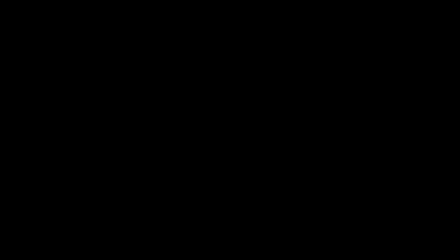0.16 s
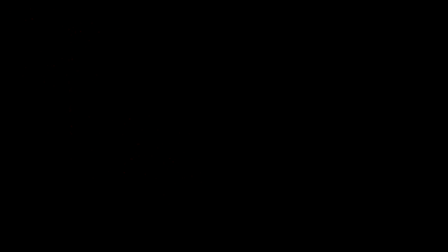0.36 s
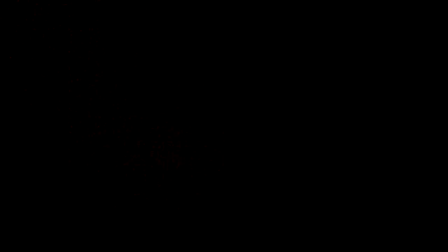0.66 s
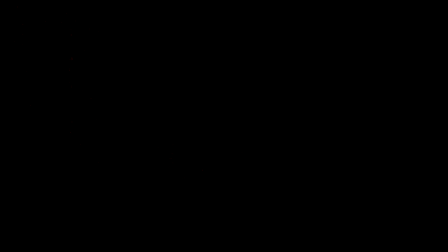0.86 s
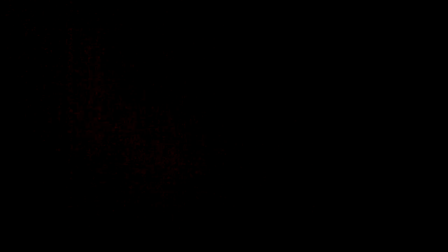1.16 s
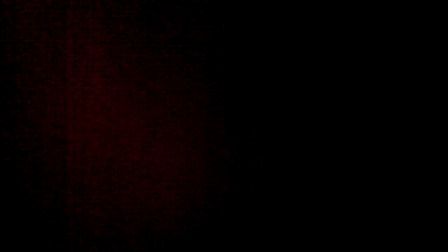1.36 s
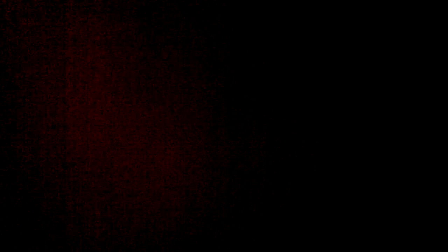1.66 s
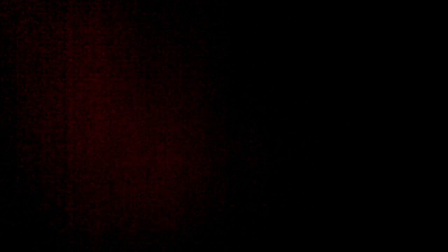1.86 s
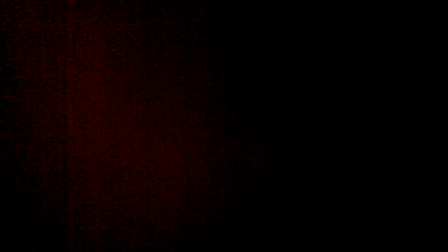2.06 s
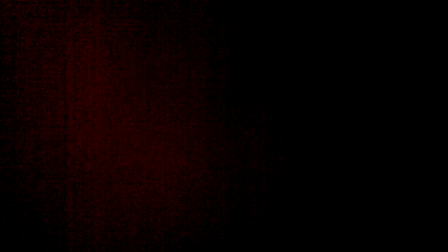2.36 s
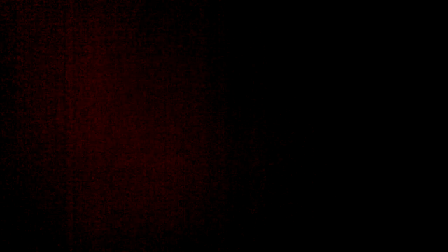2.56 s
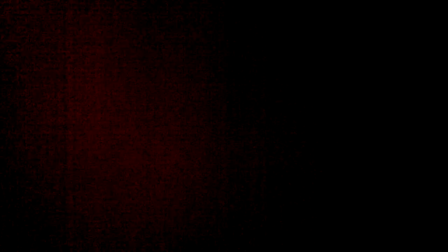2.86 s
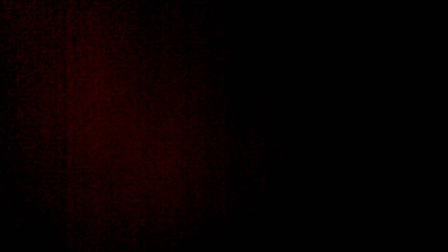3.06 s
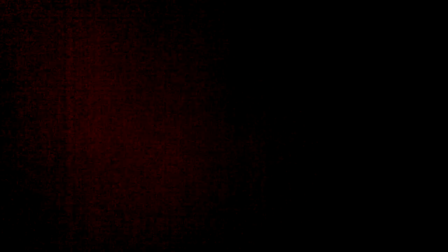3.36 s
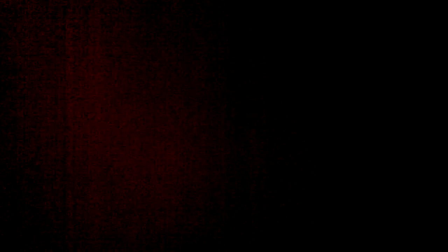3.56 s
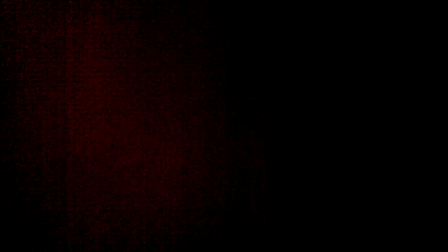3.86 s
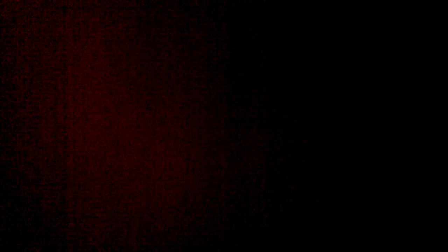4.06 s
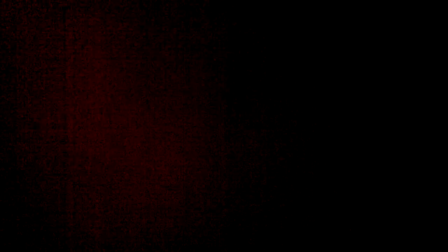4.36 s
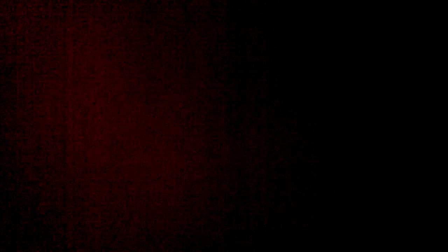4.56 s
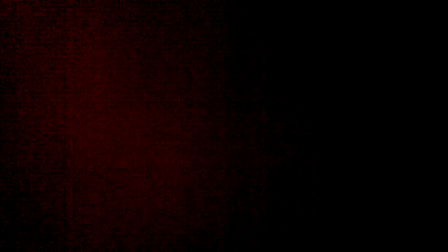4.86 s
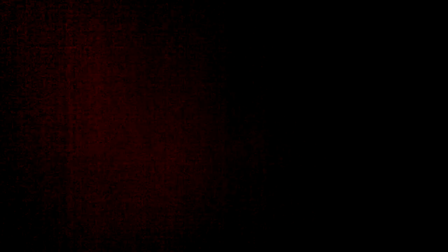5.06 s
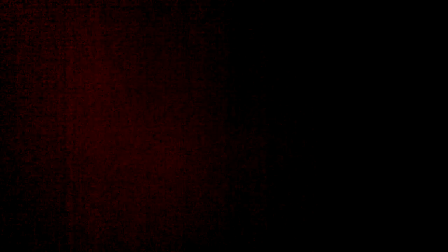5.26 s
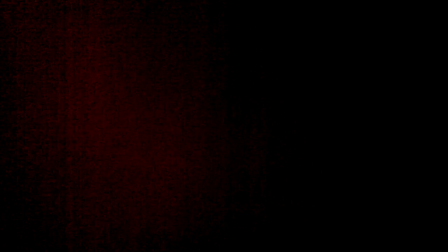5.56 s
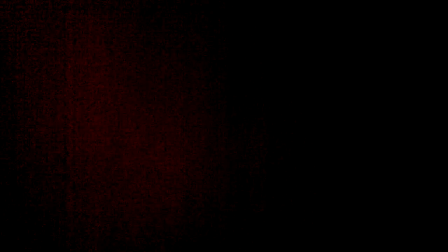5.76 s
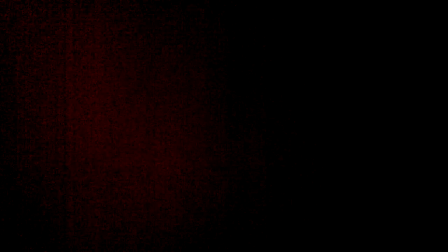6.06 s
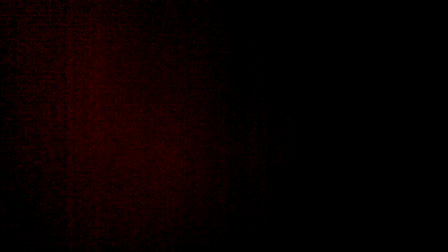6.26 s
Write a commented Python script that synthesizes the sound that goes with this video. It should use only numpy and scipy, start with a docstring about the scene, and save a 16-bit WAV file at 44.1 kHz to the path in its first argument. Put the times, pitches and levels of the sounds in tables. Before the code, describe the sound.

A close, dry perspective on a failed laptop hard drive in a quiet room with soft air noise, a low hum and a very thin high whine. At 0.11 s a hand hits the case with a hard double clack, with a grainy scuff fading until 0.24 s. A faint bump follows at 0.25, a duller double thud at 0.61, then weaker bumps at 0.74, 0.87 and 0.90 and small edge snaps until 1.02. At 1.04 the latch gives a tiny high tick; a faint stuttering motor rasp runs from 1.12 and quickens into a very short, loud metallic knock at 1.32, with a lighter knock back at 1.73. The cycle repeats: tick 2.47, scrape 2.50, knock 2.67, return 3.08; then tick 3.82, scrape 3.87, knock 4.03, return 4.44. A last tick at 5.18 and scrape until 5.37 bring no knock. Barely audible stray ticks dot the quiet to the end.

```python
"""In a quiet room, close up: a failed laptop hard drive. A hand bumps and scuffs its case at first.
Then the drive tries over and over: a latch tick, a short scrape of motor steps that mostly quicken,
a hard knock of the head arm on its stop and a lighter knock back, over a low hum and a thin whine.
Knocks and bumps are dying sines with short noise bursts; the rub is a dense stream of tiny slips.
The motor is pulsed, narrow-band noise with a ringing hub; air and hiss are coloured noise."""
import sys
import numpy as np
from scipy import signal
from scipy.fft import rfft, irfft
from scipy.io import wavfile

SR = 44100
rng = np.random.default_rng(int(sys.argv[2]) if len(sys.argv) > 2 else 0)


def bounce(signal):
    """Save signal as a 16-bit WAV file at the path given by the first command-line argument."""
    frames = np.transpose(np.atleast_2d(signal))
    limited = np.clip(frames, -1, 1)
    pcm = np.round(limited * 32767).astype(np.int16)
    wavfile.write(sys.argv[1], SR, pcm)


N = 283122
TIME = np.arange(N) / SR
RING = TIME[:SR // 6]  # the time axis of one blow

# In the tables, t60/s is the time a ring takes to fade by 60 dB.
# what the arm and its stop ring with: f/Hz, level/dB, t60/s
ARM_MODES = [(1083, -39, 0.046), (1302, -42.5, 0.078), (1500, -55, 0.062), (2011, -29, 0.054),
             (2430, -38.5, 0.023), (3285, -14.5, 0.006), (3720, -27, 0.033), (4030, 3.6, 0.0073),
             (4110, 5.5, 0.0037), (4900, -12.5, 0.011), (5244, -12.5, 0.0089), (5990, -6.5, 0.0025),
             (6490, -22, 0.017), (7020, -13, 0.0046), (7580, -25.5, 0.014), (8080, -30, 0.019),
             (9340, -21, 0.0031), (11600, -28, 0.0076)]
# colour of the noise at the instant of contact: f/Hz, level per Hz/dB
CRACK_COLOUR = [(470, -55), (800, -47), (1180, -2.5), (3210, -32), (4060, 3), (4600, -10), (5340, -21.5),
                (10300, -42), (11700, -31), (12900, -42), (15500, -43)]
# what the latch rings with: f/Hz, level/dB, t60/s
LATCH_MODES = [(8180, 2.5, 0.0093), (8380, -8.5, 0.0047)]
# the head arm touches the latch before each try: t/s
LATCH_TIMES = [1.0440, 2.4734, 3.8227, 5.1829]
# how every latch touch sounds: level/dB, brightness/(dB per octave), latch ring/dB
LATCH_TOUCH = (-38.7, 9, -40.5)
# the head arm is thrown against its stop: t/s
THROW_TIMES = [1.3245, 2.6736, 4.0339]
# a hard knock, a faint touch and a knock back:
# t after the throw/s, level/dB, brightness/(dB per octave), latch ring/dB
THROW_KNOCKS = [(0, -15, 1, -49), (.1365, -44, 1, -50), (.4099, -27, -1.2, -37.5)]

# the motor tries to turn: start t/s, end t/s, sizzle level/dB, jolt level/dB, current build-up/s
MOTOR_TRIES = [(1.117, 1.145, -56, -54.5, .005), (1.147, 1.323, -52, -56, .08),
               (2.502, 2.675, -54.5, -55, .005), (3.871, 4.035, -54, -54.5, .005),
               (5.2235, 5.372, -54.5, -54.5, .005)]
# noise bands of the motor windings: f/Hz, width/Hz, level/dB
WINDING_BANDS = [(5500, 4000, 1), (8120, 300, 1), (9200, 600, -5), (10820, 500, 3), (11900, 1600, -8),
                 (14200, 700, 0), (15600, 700, 0)]
# what the motor hub rings with: f/Hz, level/dB, t60/s
HUB_MODES = [(1052, -4, 0.028), (1130, -2.5, 0.032), (1440, -1.5, 0.0086), (1880, -2, 0.014),
             (2330, -0.5, .01), (2900, -5, .005), (4250, -0.5, 0.0043)]
START_STEPS_PER_S, START_S = 100, .042  # each try begins with slow, even steps
RUN_STEPS_PER_S, SPEEDUP_PER_S2 = 120, 640  # then the rate jumps and climbs steadily

# faint stray ticks: t/s, level/dB, f/Hz
STRAY_TICKS = [(.4265, -54, 7800), (.8073, -52.5, 7340), (.8155, -55, 7400), (.988, -52, 7800),
               (1.095, -55, 7800), (3.0142, -53, 8200), (3.4601, -57, 6600), (4.8022, -56, 8700)]
# a faint tick that keeps time: first t/s, period/s, level/dB, f/Hz
PACED_TICK = (3.649, .6423, -56, 8050)

# bumps on the case: t/s, thud level/dB, hardness f/Hz
CASE_BUMPS = [(.1076, -17.7, 2600), (.1121, -22.5, 2300), (.251, -41, 1500), (.6146, -22, 860),
              (.6177, -20.3, 1710), (.7387, -27, 1190), (.8708, -36, 1160), (.9003, -41, 2000)]
# after a full blow the case bounces twice: t after the blow/s, level/dB, share of the hardness
CASE_BOUNCES = [(.0104, -7, .59), (.0218, -16.6, .95)]
FULL_BLOW_DB = -19
BOUNCE_SOONER, BOUNCE_WEAKER = .29, .75  # a lighter blow bounces sooner and less: powers of its strength
# what the case rings with: f/Hz, level/dB, t60/s
CASE_MODES = [(231, -4.5, 0.0077), (285, -14, 0.028), (371.5, -15.5, 0.042), (438, -4, 0.013),
              (571, -17, 0.07), (676, -9, 0.02), (859, -11, 0.035), (995, -7.5, 0.029), (1220, 1, 0.014),
              (1403, -7, 0.04), (1574, -22, 0.06), (1600, 5, 0.0047), (1820, 5, 0.0068), (2113, -5, 0.022),
              (2267, -9, 0.019), (2930, -7, 0.0081), (3430, -12, 0.018), (3700, -9, 0.018)]
# the first, hardest blow also rings the hollow of the case: f/Hz, level/dB, t60/s
HOLLOW_MODES = [(384.5, -40.5, .17), (415, -22, 0.034)]
# sharp snaps of the case's edges: t/s, level before the treble cut/dB, top f/Hz
EDGE_SNAPS = [(.1076, -17, 6000), (.1072, -19, 15000), (.1125, -21.5, 6000), (.1822, -34, 9000),
              (.188, -37, 9000), (.6147, -37.5, 9000), (.6177, -32.5, 7000), (.9003, -39.5, 8000),
              (.9157, -31, 10900), (1.019, -39, 7000), (1.0244, -39.5, 20200)]
# colour of the snap noise: f/Hz, level per Hz/dB
SNAP_COLOUR = [(880, -3), (1500, -8.5), (5040, -7.5), (7470, -1), (9010, 3), (12400, -10.5), (15800, -9)]

# strokes of the hand over the case: start t/s, length/s, level/dB, swell/(dB per s)
HAND_RUBS = [(.108, .134, -38.5, -44), (.25, .11, -63, -75), (.418, .11, -65, -25), (.775, .125, -71, 40),
             (.945, .13, -61, -50)]
# colour of the rubbing noise: f/Hz, level per Hz/dB
RUB_COLOUR = [(150, -43), (250, -21), (297, -13), (372, -4), (427, -6.5), (795, -21), (1310, -0.5),
              (1990, -9.5), (2660, -17), (3110, -8.5), (5500, -15.5), (6310, -7.5), (7130, -8), (8620, -1),
              (15500, -37.5)]
RUB_ATTACK_S, RUB_RELEASE_DB_PER_S = .008, 1100

# colour of the room air and hiss: f/Hz, level per Hz/dB
AIR_COLOUR = [(20, -12.5), (50, -6.5), (110, -5), (150, 0), (190, -4), (300, -4), (800, -6.5),
              (2000, -13.5), (6000, -17.5), (7400, -15), (8100, -12), (10000, -18.5), (15500, -17)]
AIR_DB = -62.5
# steady hum and whine: f/Hz, width/Hz, level/dB, waver (0 to 1)
HUM_LINES = [(90, 5, -73.5, 0.25), (222, 15.6, -76, 0.96), (7984, 2.5, -75, 0.3)]
# the level dips briefly: from t/s, to t/s
DROPOUT = (0.0917, .1055)
TOP_HZ = 15850  # the treble ends here


def amp(db):
    """Turns decibels into a gain."""
    return 10 ** (np.asarray(db) / 20)


def evened(x):
    """Scales a sound to an rms (average strength) of 1."""
    return x / np.sqrt(np.mean(x ** 2) + 1e-20)


def add(mix, s, sound):
    """Mixes a sound in at time s."""
    part = mix[max(round(s * SR), 0):][:len(sound)]
    part += sound[:len(part)]


def coloured(x, points):
    """Shapes the spectrum of x by a line drawn through (Hz, dB) points, at rms 1."""
    hz, db = np.transpose(points)
    f = np.fft.rfftfreq(len(x), 1 / SR)
    gain = amp(np.interp(np.log(f + 1), np.log(hz + 1), db))
    return evened(irfft(rfft(x) * gain, len(x)))


def band(hz, width_hz, size):
    """Noise gathered around one resonance, at rms 1."""
    f = np.fft.rfftfreq(size, 1 / SR)
    noise = rfft(rng.standard_normal(size))
    return evened(irfft(noise / (1 + ((f - hz) / width_hz) ** 2), size))


def fade(t60):
    """An exponential decay by 60 dB in t60 seconds."""
    return np.exp(-np.log(1000) * RING / t60)


def ring(modes, weight_db=lambda hz: 0):
    """Dying sines of a struck body; weight_db says how strongly the blow reaches each."""
    out = np.zeros(len(RING))
    for k, (hz, db, t60) in enumerate(modes):
        # neighbouring modes swing against each other, so the sound takes a moment to build
        sign = (-1) ** k
        out += sign * amp(db + weight_db(hz)) * fade(t60) * np.sin(2 * np.pi * hz * RING)
    return out


def burst(peak_s):
    """An envelope that rises to 1 at peak_s and dies away."""
    return RING / peak_s * np.exp(1 - RING / peak_s)


def knocks():
    """Lists every contact of the arm: t/s, level/dB, brightness/(dB per octave), latch ring/dB."""
    rows = [(s, *LATCH_TOUCH) for s in LATCH_TIMES]
    for s in THROW_TIMES:
        rows += [(s + delay, *knock) for delay, *knock in THROW_KNOCKS]
    return rows


def head_arm(contact_s=.0001, crack_db=-23, crack_s=0.00086, pivot_hz=4100,
             shiver_db=-39.5, shiver_width_hz=900, shiver_t60=0.1):
    """Each contact makes the metal ring and crack, loose parts shiver after it, and the latch rings."""
    out = np.zeros(N)
    press = 1 - np.exp(-RING / contact_s)  # the force sets in over the contact time
    for s, db, tilt_db, latch_db in knocks():
        # brightness tilts the ring around the pivot
        metal = press * ring(ARM_MODES, lambda hz: tilt_db * np.log2(hz / pivot_hz))
        crack = coloured(rng.standard_normal(len(RING)), CRACK_COLOUR) * burst(crack_s)
        shiver = band(pivot_hz, shiver_width_hz, len(RING)) * fade(shiver_t60)
        knock = metal + amp(crack_db) * crack + amp(shiver_db) * shiver
        add(out, s, amp(db) * knock + amp(latch_db) * ring(LATCH_MODES))
    return out


def step_rate(age):
    """Motor steps a second at this age of a try."""
    running = RUN_STEPS_PER_S + SPEEDUP_PER_S2 * (age - START_S)
    return np.where(age < START_S, START_STEPS_PER_S, running)


def motor(between=0.37, sizzle_s=0.0042, lag_s=.0004, off_beat_db=5.0, uneven_db=2.0,
          rattle=0.52, rattle_s=0.0013, weak_db=-8):
    """Each step of current makes the windings sizzle; every second step jolts and rattles the hub."""
    current, jolts = np.zeros(N), np.zeros(N)
    pulse = np.sin(np.pi * np.minimum(RING / sizzle_s, 1)) ** 2
    for start, end, sizzle_db, jolt_db, build_s in MOTOR_TRIES:
        age = np.arange(0, end - start, 1 / SR)
        step_count = np.cumsum(step_rate(age)) / SR
        # a step falls wherever the count passes a whole number
        steps = age[np.diff(np.floor(step_count), prepend=-1) > 0]
        flow = np.full(len(age), between)  # the current that flows between pulses
        for k, s in enumerate(steps):
            step_db = uneven_db * rng.standard_normal() + off_beat_db * (k % 2 - 0.5)
            add(flow, s + lag_s, amp(step_db) * (1 - between) * pulse)
            if k % 2 == 0:
                chatter = burst(rattle_s) * rng.standard_normal(len(RING))
                click = np.sqrt(max(1 - rattle ** 2, 0)) * (RING == 0)
                kick = click + rattle * chatter / np.linalg.norm(chatter)
                add(jolts, start + s, amp(jolt_db) * kick)
        build_db = weak_db * np.maximum(1 - age / build_s, 0)
        add(current, start, flow * amp(sizzle_db + build_db))
    sizzle = evened(sum(amp(db) * band(hz, width, N) for hz, width, db in WINDING_BANDS))
    return current * sizzle + signal.fftconvolve(jolts, ring(HUB_MODES))[:N]


def ticks(width_hz=550, peak_s=0.00085):
    """Short fizzy ticks, each in one narrow band: some stray, some at a steady pace."""
    out = np.zeros(N)
    shape = burst(peak_s)
    first, period, paced_db, paced_hz = PACED_TICK
    paced = [(s, paced_db, paced_hz) for s in np.arange(first, N / SR, period)]
    for s, db, hz in STRAY_TICKS + paced:
        fizz = shape * band(hz, width_hz, len(RING))
        # every tick gets the energy of its envelope
        add(out, s, amp(db) * fizz * np.linalg.norm(shape) / np.linalg.norm(fizz))
    return out


def blows():
    """Lists every bump followed by its bounces: t/s, thud level/dB, hardness f/Hz."""
    rows = []
    for s, db, hard_hz in CASE_BUMPS:
        force_db = db - FULL_BLOW_DB
        rows.append((s, db, hard_hz))
        for delay, loss_db, share in CASE_BOUNCES:
            bounce_s = s + delay * amp(BOUNCE_SOONER * force_db)
            bounce_db = db + loss_db + BOUNCE_WEAKER * force_db
            rows.append((bounce_s, bounce_db, hard_hz * share))
    return rows


def bumps(snap_s=0.00053, contact_s=0.00022, low_cut_hz=150,
          rock_hz=105, rock_db=-23.5, rock_s=0.009, soft_hz=1000):
    """A soft blow reaches mainly the low modes and rocks the whole case; a hard edge adds a snap."""
    out, rocking = np.zeros(N), np.zeros(N)
    press = 1 - np.exp(-RING / contact_s)
    f = np.fft.rfftfreq(len(RING), 1 / SR)
    for s, thud_db, hard_hz in blows():
        thud = press * ring(CASE_MODES, lambda hz: -10 * np.log10(1 + (hz / hard_hz) ** 4))
        add(out, s, amp(thud_db) * thud)
        rock_gain = amp(thud_db + rock_db) / (1 + (hard_hz / soft_hz) ** 2)
        add(rocking, s, rock_gain * burst(rock_s) * np.sin(2 * np.pi * rock_hz * RING))
    for s, snap_db, top_hz in EDGE_SNAPS:
        grit = coloured(rng.standard_normal(len(RING)), SNAP_COLOUR)
        dulled = irfft(rfft(grit) / np.sqrt(1 + (f / top_hz) ** 6), len(RING))
        add(out, s, amp(snap_db) * dulled * burst(snap_s))
    add(out, CASE_BUMPS[0][0], press * ring(HOLLOW_MODES))
    # the thin shell itself radiates little bass
    low_cut = signal.butter(2, low_cut_hz, "highpass", fs=SR, output="sos")
    return signal.sosfilt(low_cut, out) + rocking


def pressure():
    """Each stroke sets in quickly, swells or fades evenly, and lifts off."""
    out = np.zeros(N)
    age = TIME[:SR // 2]
    for start, length, db, swell in HAND_RUBS:
        swell_db = swell * np.minimum(age, length)
        release_db = RUB_RELEASE_DB_PER_S * np.maximum(age - length, 0)
        add(out, start, np.minimum(age / RUB_ATTACK_S, 1) * amp(db + swell_db - release_db))
    return out


def rubbing(slips_per_s=4500, spread_db=3.5, smear_s=0.0002):
    """Dense tiny slips of uneven size, each smeared into a short fizz."""
    size = amp(spread_db * np.minimum(rng.exponential(1, N), 4))
    slips = size * (rng.random(N) < slips_per_s / SR)
    power = signal.lfilter([1], [1, -np.exp(-1 / (smear_s * SR))], slips ** 2)
    fizz = np.sqrt(power) * rng.standard_normal(N)
    return coloured(fizz, RUB_COLOUR) * pressure()


def room(x, wet_db, t60):
    """Adds a faint, short tail of scattered reflections."""
    tail = rng.standard_normal(len(RING)) * fade(t60) * (RING > .003)  # nothing returns before 3 ms
    return x + amp(wet_db) * signal.fftconvolve(x, tail / np.linalg.norm(tail))[:N]


def background():
    """Steady air, a low hum and a thin whine; narrow noise around each pure tone makes it waver."""
    out = amp(AIR_DB) * coloured(rng.standard_normal(N), AIR_COLOUR)
    for hz, width, db, waver in HUM_LINES:
        tone = np.sqrt(2) * np.cos(2 * np.pi * hz * TIME)
        out += amp(db) * evened(tone + waver * band(hz, width, N))
    return out


def scene():
    """The drive and the hand on it, in the room."""
    drive = room(head_arm() + motor() + ticks(), wet_db=-27, t60=.2)
    hand = room(bumps(), wet_db=-16.5, t60=0.14) + rubbing()
    return (drive + hand + background())[None]


def record(dry):
    """Dips the level briefly, then cuts the treble above TOP_HZ."""
    live = np.where((TIME > DROPOUT[0]) & (TIME < DROPOUT[1]), amp(-28), 1)
    treble_cut = signal.firwin(511, TOP_HZ, window=("kaiser", 9), fs=SR)
    return signal.oaconvolve(dry * live, treble_cut[None], "same")


dry = scene()
out = record(dry)
bounce(out)
```